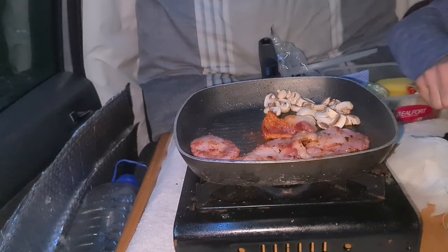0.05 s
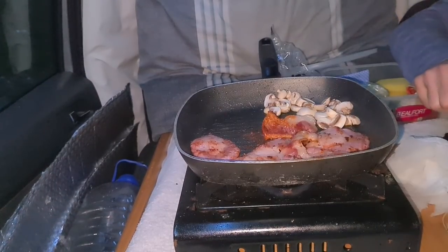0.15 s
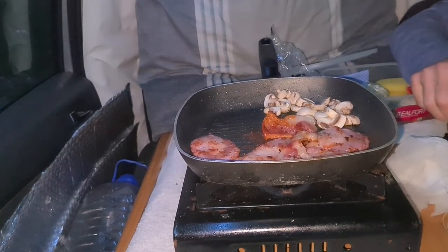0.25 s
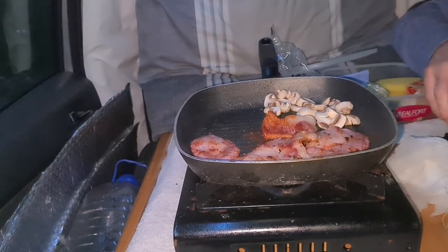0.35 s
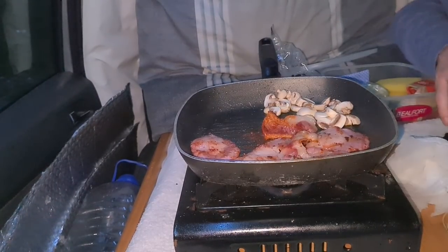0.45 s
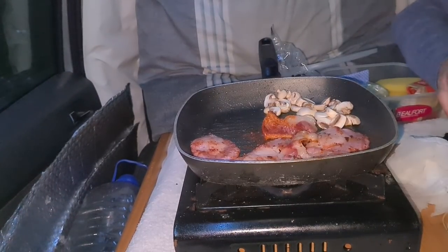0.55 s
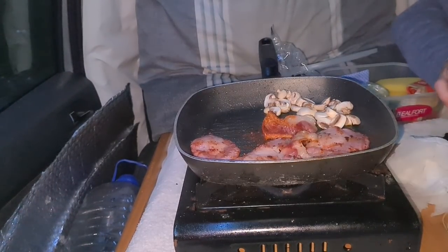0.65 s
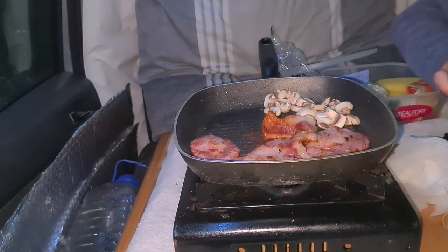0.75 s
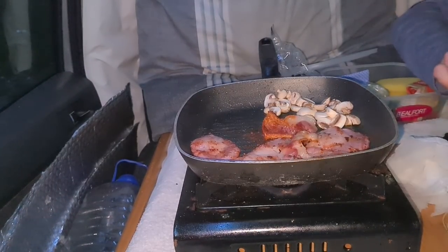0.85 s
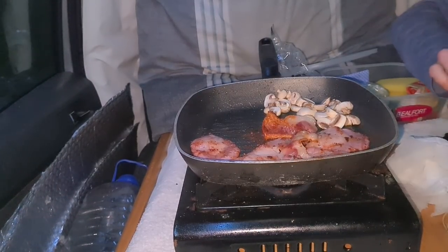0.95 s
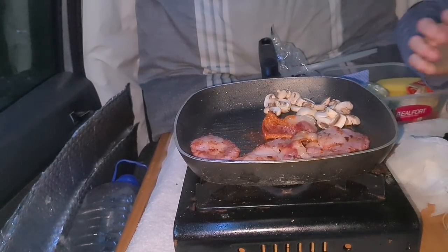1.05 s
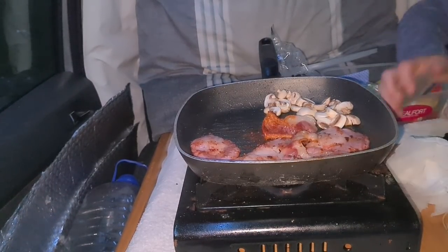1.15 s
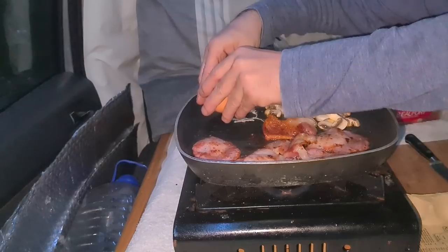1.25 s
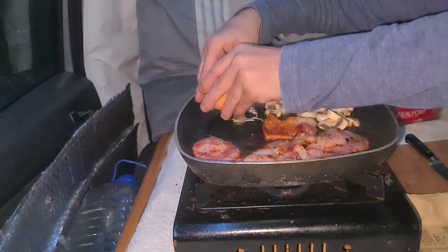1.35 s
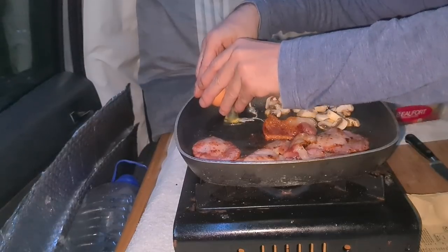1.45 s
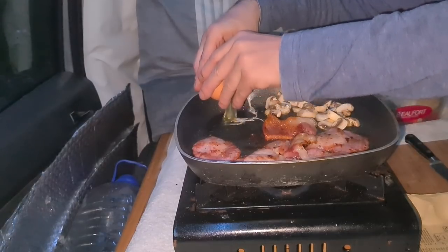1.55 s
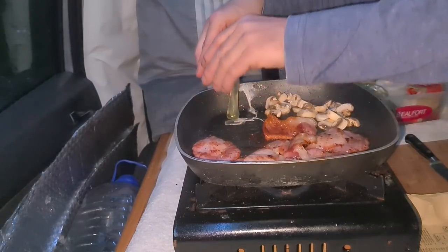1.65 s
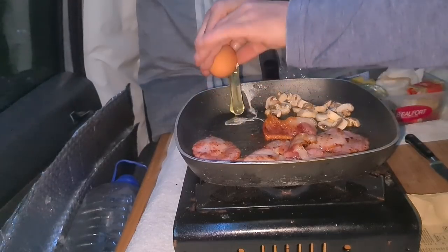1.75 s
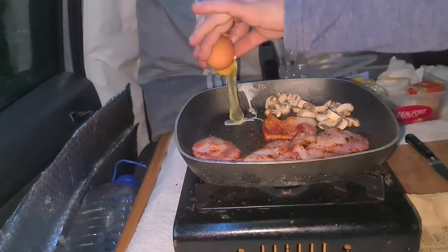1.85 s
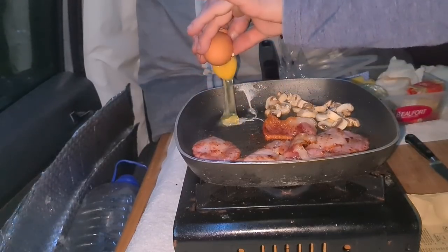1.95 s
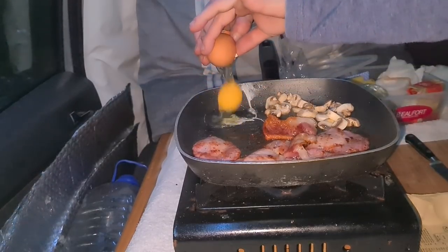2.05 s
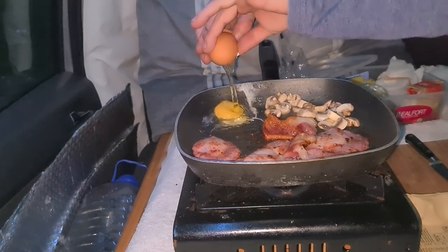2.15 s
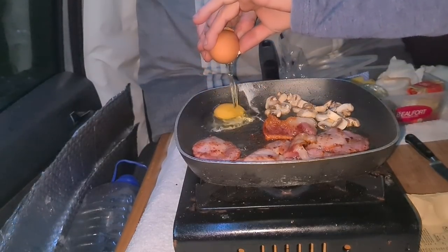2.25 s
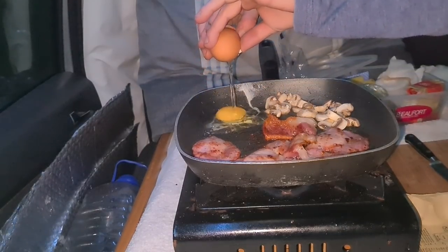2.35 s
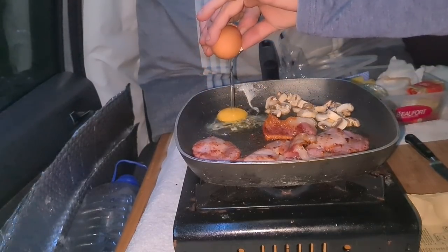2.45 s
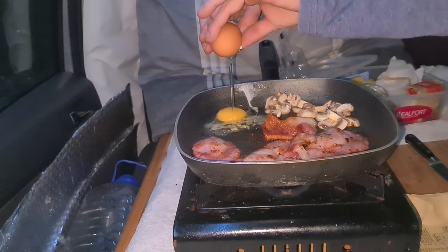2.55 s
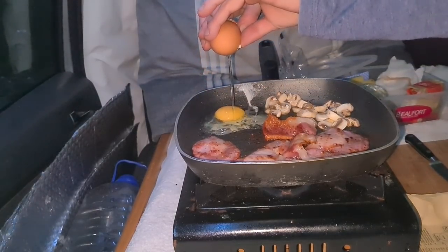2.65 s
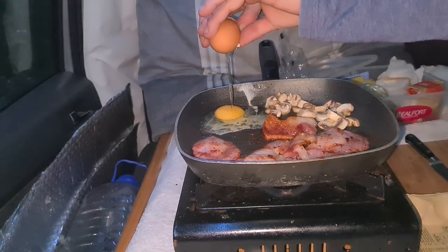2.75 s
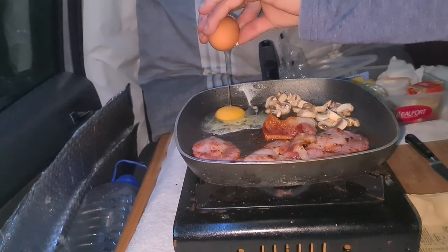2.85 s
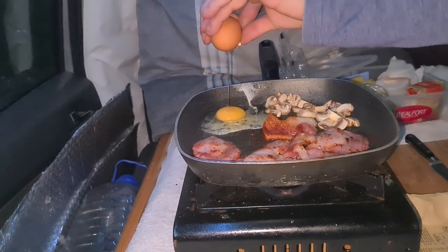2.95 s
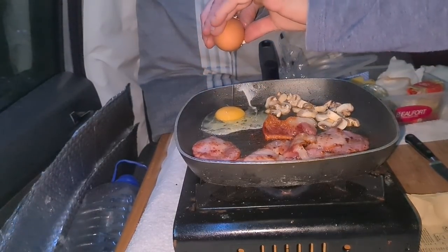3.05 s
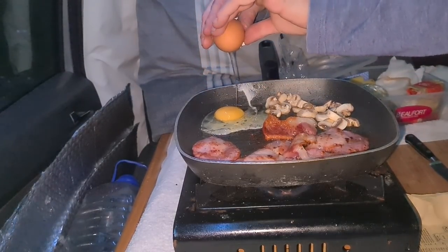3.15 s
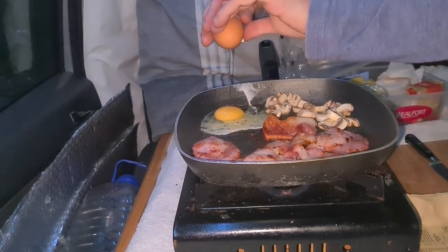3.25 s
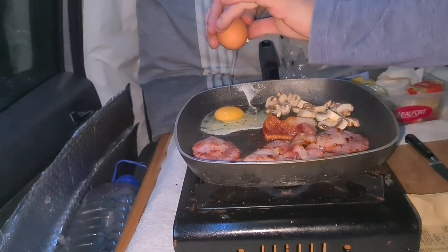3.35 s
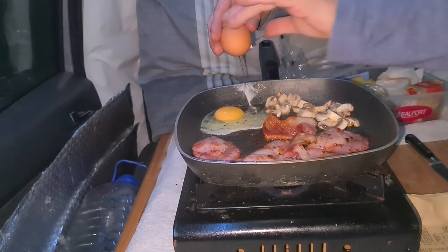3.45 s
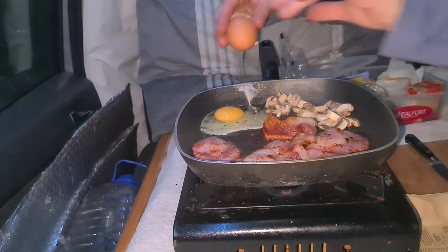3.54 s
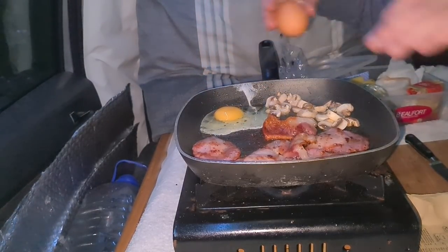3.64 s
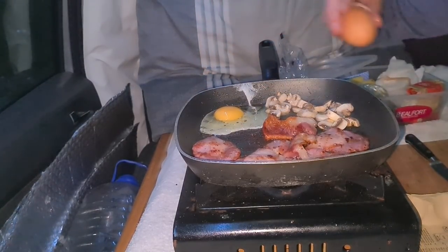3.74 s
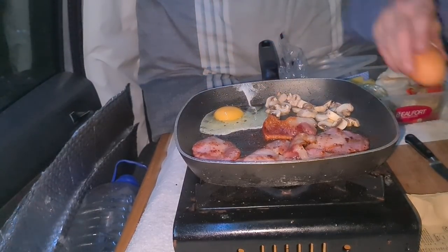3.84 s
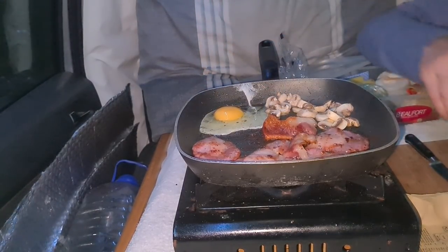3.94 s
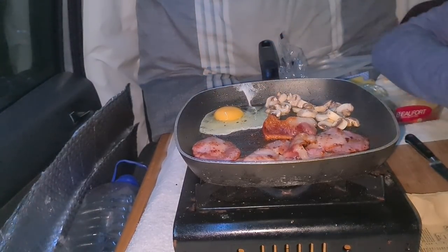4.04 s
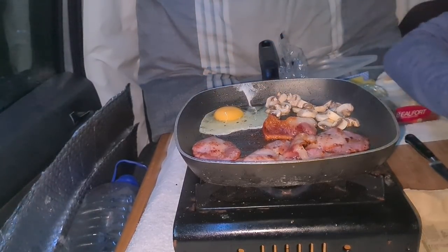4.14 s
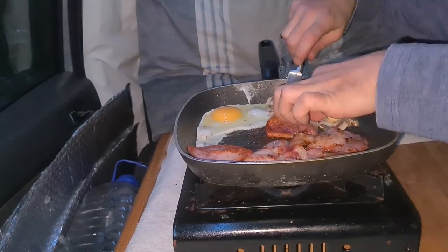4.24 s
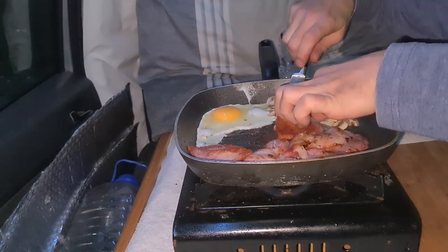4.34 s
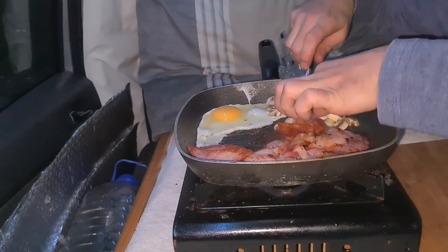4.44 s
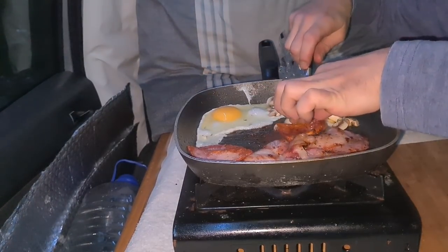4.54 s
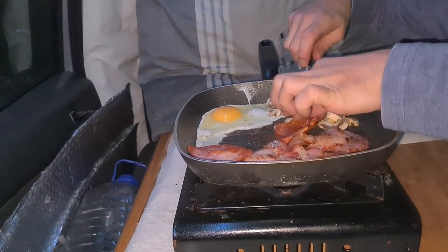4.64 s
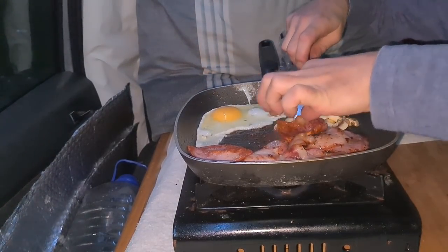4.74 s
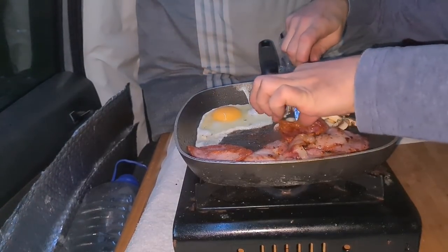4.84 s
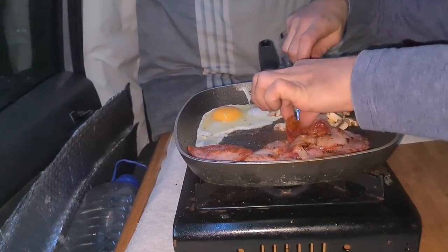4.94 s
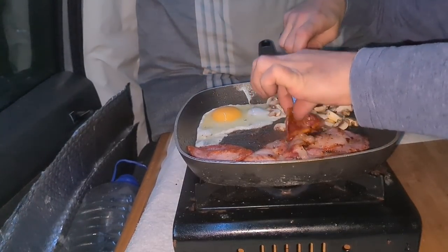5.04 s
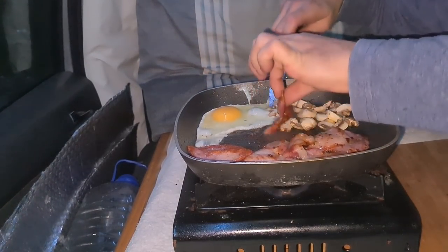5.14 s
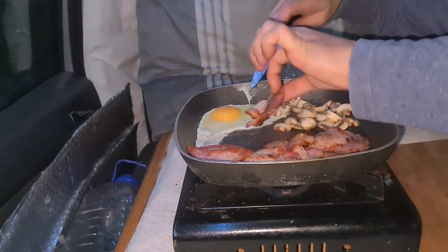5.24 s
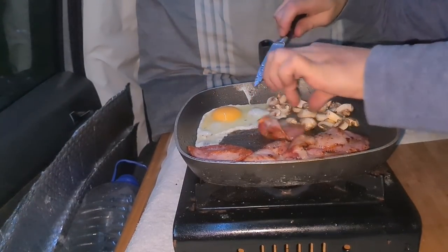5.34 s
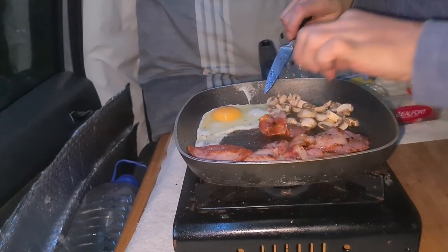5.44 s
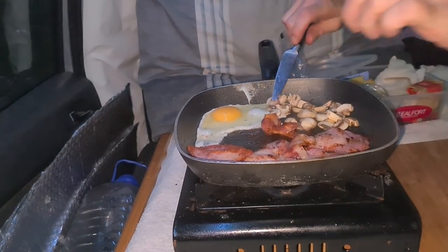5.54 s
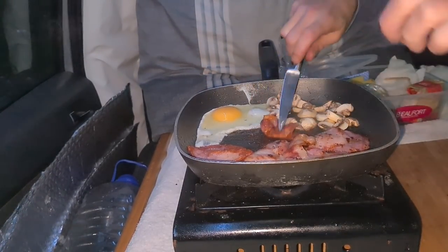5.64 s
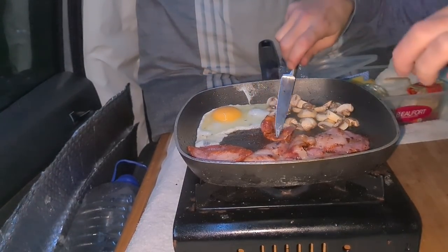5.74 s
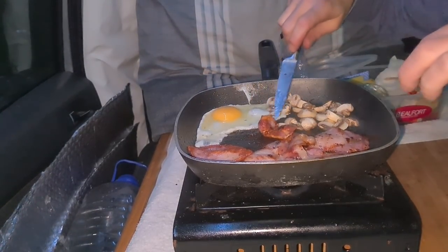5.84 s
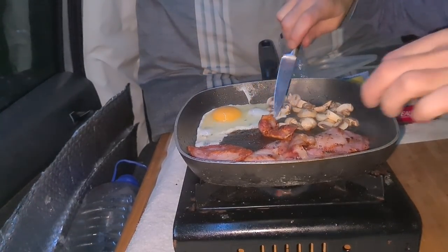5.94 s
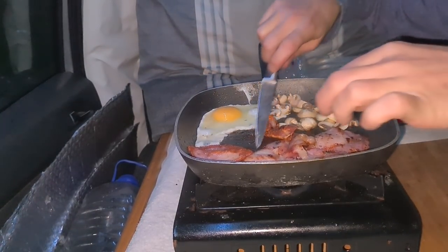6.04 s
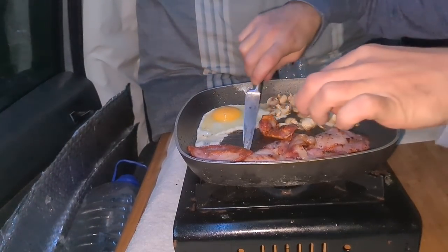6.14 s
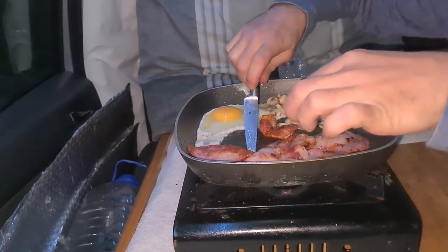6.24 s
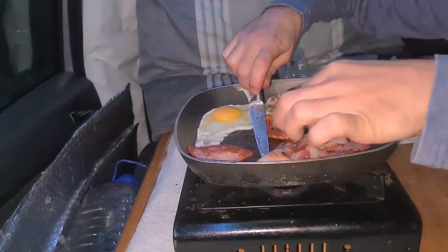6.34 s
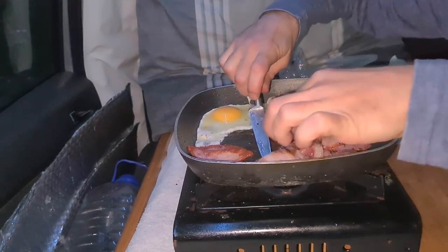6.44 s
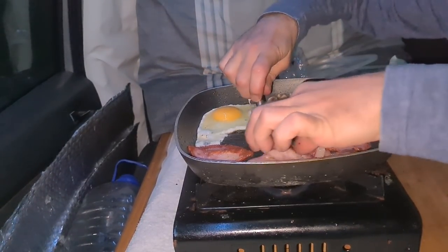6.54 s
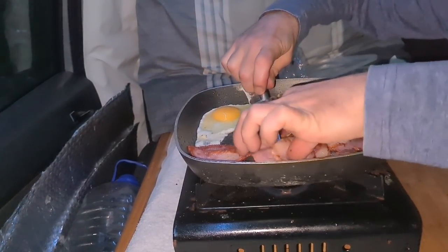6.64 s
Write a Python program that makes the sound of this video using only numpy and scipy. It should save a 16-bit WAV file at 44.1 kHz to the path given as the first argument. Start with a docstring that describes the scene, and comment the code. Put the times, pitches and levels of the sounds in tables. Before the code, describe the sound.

An egg is cracked with small gritty snaps beside a quietly sizzling pan. The frying suddenly steps up, becoming dense, fizzy and steady, with random sharp pops of fat over low fluttering gas-flame noise. In the last two seconds hard metallic ticks, brief scrapes and muffled knocks come from cutlery. Very near, dry, wide stereo, with a short soft cabin tail.

```python
"""Breakfast in a pan on a camping stove

Bacon, mushrooms and an egg fry on a gas stove in a small cloth-lined cabin.
Shell cracks and fat spits are short gritty noise bursts with a ring; the sizzle is a cloud of random bubble
grains in three sizes, over steam hiss. Cutlery ticks, scrapes and dull knocks turn the bacon and nudge the pan.
The burner is low fluttering noise; early on, it and the sizzle shift abruptly in level."""
import sys
import numpy as np
from scipy import signal
from scipy.fft import rfft, irfft
from scipy.io import wavfile
from scipy.ndimage import uniform_filter1d

SR = 44100
rng = np.random.default_rng(int(sys.argv[2]) if len(sys.argv) > 2 else 0)


def dump_mix(stems):
    """Bounce the given channels to the path in sys.argv[1] as a 16-bit WAV at rate SR."""
    frames = np.atleast_2d(stems).T  # one column per channel
    limited = np.clip(frames, -1, 1)  # hard clip at full scale
    pcm = np.round(limited * 32767).astype(np.int16)
    wavfile.write(sys.argv[1], SR, pcm)


N = 295073
TIME = np.arange(N) / SR  # s
FREQ = np.maximum(np.arange(N // 2 + 1) * SR / N, 1)  # Hz
STEP_S, STEP_LENGTH_S = 1.2, 0.011  # the levels of sizzle and burner shift abruptly


def undb(db):
    """Decibels to gain."""
    return 10 ** (np.asarray(db) / 20)


def unit(x):
    """Scale to rms 1."""
    return x / np.sqrt(np.mean(x ** 2))


def along(points):
    """Spread a table of (f/Hz, value) over the frequency axis, straight in log frequency."""
    hz, value = np.transpose(points)
    return np.interp(np.log(FREQ), np.log(hz), value)


def bump(hz, width):
    """A resonance-shaped hump over frequency, 1 at its centre."""
    return 1 / (1 + (2 * (FREQ - hz) / width) ** 2)


def response(db):
    """Causal minimum-phase impulse response for a gain curve in dB."""
    size = 4096
    grid = np.arange(size // 2 + 1) * SR / size
    cepstrum = irfft(np.log(undb(np.interp(grid, FREQ, db))))
    # folding the cepstrum forward in time makes the response causal
    cepstrum[1:size // 2] *= 2
    cepstrum[size // 2 + 1:] = 0
    return irfft(np.exp(rfft(cepstrum)))


def colour(x, db):
    """Filter both ears with a gain curve."""
    return signal.oaconvolve(x, response(db)[None], axes=1)[:, :N]


def ring(x, hz, q):
    """One resonance, gain 1 at its centre."""
    return signal.lfilter(*signal.iirpeak(min(hz, SR / 2 - 1000), q, fs=SR), x)


def walk(rate):
    """Smooth random wander with a spread near 1, taking a new value rate times a second."""
    hold = int(SR / rate)
    steps = np.repeat(rng.standard_normal(N // hold + 1), hold)
    return 1.3 * uniform_filter1d(steps, hold)[:N]


def ramp(start, length):
    """A straight rise from 0 to 1."""
    return np.clip((TIME - start) / length, 0, 1)


def swell(s, length):
    """A smooth hump from 0 to 1 and back, centred on s."""
    return np.sin(np.pi * ramp(s - length / 2, length)) ** 2


def burner():
    """Low noise of the gas flame and the hot air above it flutters, and swells in a draught."""
    # tone of the flame: f/Hz, density/dB per Hz
    flame_tone = [(15, -1), (45, -1), (70, -7), (120, -11.5), (180, -22), (400, -35), (900, -47.5),
                  (3000, -83)]
    # the rumble swells as the arms stir the air: centre/s, length/s, lift/dB
    draughts = [(.1, 0.38, 6), (0.857, .2, 9), (1.273, 0.23, 9.5), (1.92, 1.7, 6), (3.97, 0.15, 5),
                (4.884, 1.24, 8), (5.48, 0.18, 14), (5.773, .24, 10), (6.277, 0.43, 8), (6.69, 0.29, 11.5)]
    start_db, step_rise_db = -62, 5
    flutter_db, flutter_per_s = -0.5, 12
    level_db = start_db + step_rise_db * ramp(STEP_S, STEP_LENGTH_S) + flutter_db * walk(flutter_per_s)
    level_db = level_db + sum(db * swell(s, length) for s, length, db in draughts)
    return undb(level_db) * unit(colour(rng.standard_normal((2, N)), along(flame_tone)))


def cabin(x, t60, wet_db, count=5):
    """A short soft tail from the cloth-lined walls; moving arms keep changing its echoes."""
    t = TIME[:SR // 5]
    decay = np.exp(-np.log(1000) * t / t60)
    tails = rng.standard_normal((count, 2, len(t))) * decay * (t > .005)
    tails /= np.sqrt((tails ** 2).sum(2, keepdims=True))
    # random wanders drift from one tail to another at constant power
    shares = np.array([walk(2.005) for _ in range(count)])
    shares /= np.sqrt((shares ** 2).sum(0))
    wet = sum(share * signal.oaconvolve(x, tail, axes=1)[:, :N] for share, tail in zip(shares, tails))
    return x + undb(wet_db) * wet


def knocks():
    """Soft pushes wake low modes around their own pitch, reaching further below it than above."""
    # dull knocks: t/s, push level/dB, centre of the push f/Hz
    pushes = [(0.057, -35, 268), (0.337, -47.5, 384), (0.355, -43.5, 374), (0.850, -35, 356),
              (0.866, -38, 278), (1.22, -48, 68.5), (2.878, -49, 270), (2.903, -45, 287), (3.963, -56, 180),
              (4.716, -47, 300), (5.47, -42.5, 137), (5.699, -46, 314), (5.761, -44, 223), (6.21, -39, 575)]
    # low modes of pan, stove and table: f/Hz, level/dB
    stove_modes = [(48, 12), (120, 1.5), (281, 0), (562, 2)]
    push_cycles = 0.81  # a push swells for this many cycles of its own pitch
    out = np.zeros(N + SR)
    t = TIME[:SR // 8]
    for s, db, push_hz in pushes:
        age = t * push_hz / push_cycles
        envelope = undb(db) * age * np.exp(1 - age)
        start = int(s * SR)
        for hz, mode_db in stove_modes:
            reach = .55 if hz > push_hz else .75
            weight = undb(mode_db) * np.exp(-(np.log(hz / push_hz) / reach) ** 2)
            detuned = hz * (1 + 0.015 * rng.standard_normal())
            out[start:start + len(t)] += weight * envelope * np.sin(2 * np.pi * detuned * t)
    return out[:N]


def slips(rate, spread_db):
    """Clicks at random moments, their levels scattered by a capped exponential draw."""
    when, size = rng.random((int(rate * N / SR), 2)).T
    heights = undb(spread_db * np.minimum(-np.log(1 - size), 4))
    return np.bincount((when * N).astype(int), heights, N)


def scrapes():
    """Uneven slips of a hard edge excite one resonance per stroke."""
    # short scrapes and rubs: start t/s, length/s, f/Hz, level/dB, sharpness q
    strokes = [(0.073, 0.065, 1890, -37.5, 24), (0.152, 0.059, 1890, -39.5, 7.4),
               (0.89, 0.018, 1060, -43, 7.4), (0.26, 0.016, 1450, -44, 3.5),
               (1.259, 0.036, 3340, -39.5, 8.6), (3.381, 0.017, 1250, -41, 4.3),
               (3.994, 0.052, 1250, -45.5, 2.7), (4.647, 0.077, 2230, -38.5, 1.15),
               (5.794, .014, 4940, -32, 5.2), (6.18, 0.022, 2700, -40, 7.7), (6.199, 0.063, 650, -53, 1.3),
               (6.323, 0.072, 530, -57, 4.7), (6.369, 0.016, 2980, -32.5, 2.8),
               (6.44, 0.12, 524, -59.5, 3.4)]
    out, clicks = np.zeros(N), slips(rate=740, spread_db=-4.0)
    clicks = clicks - clicks.mean()
    for s, length, hz, db, q in strokes:
        stroke = np.sqrt(np.maximum(0, 1 - (2 * (TIME - s) / length - 1) ** 2))
        out += undb(db) * stroke * unit(ring(ring(clicks, hz, q), hz, q))
    return out


def pan_band(k):
    """Gain in dB of the low, middle or high part (k = 0, 1, 2) of the pan's voice."""
    # colour of the frying: f/Hz, density/dB per Hz
    fat_tone = [(100, -19.5), (280, -19.5), (400, -23.5), (640, -27), (780, -13), (1100, -7.5),
                (1700, -7.5), (2700, -2), (4700, -0.5), (6600, 2.5), (9000, 3), (11000, 5.5), (12200, 6.5),
                (15500, 4.5)]
    # resonances of the pan bowl: f/Hz, width/Hz, lift/dB
    bowl = [(283, 46, 8.5), (555, 17, 6.5), (1194, 280, 5.5), (1854, 27, 7), (2620, 300, 2),
            (4170, 140, 1.5), (6920, 570, 3.5)]
    low, high = (1 / (1 + (FREQ / hz) ** 8) for hz in (2400, 8500))  # band edges, Hz
    share = (low, (1 - low) * high, 1 - high)[k]
    lift = sum(db * bump(hz, width) for hz, width, db in bowl)
    return along(fat_tone) + lift + 10 * np.log10(share + 1e-7)


def cracks(rows, gain_db, edge_db, snap, grit, rise, ring_db, q, lead_db, lean_db):
    """Each crack builds up faintly, then snaps into a gritty spray that rings briefly at its own pitch.
    Lows and highs lie edge_db from the middle; brightness tips them against each other."""
    lead = SR // 50
    t = TIME[:SR // 10] - TIME[lead]
    after = np.maximum(t, 0)
    out = np.zeros((2, N + 2 * len(t)))
    voices = [response(pan_band(k))[None, :len(t) // 2] for k in range(3)]
    lean = undb(np.array([[1], [-1]]) * lean_db / 2)
    for s, db, hz, bright_db, decay in rows:
        # roughness in steps of 30 samples
        grain = np.exp(grit * np.repeat(rng.standard_normal(len(t)), 30)[:len(t)])
        body = grain * np.exp(-after / max(decay, 1e-3)) + snap * np.exp(-after / 0.0027)
        burst = body * (1 - np.exp(-after / rise))
        shape = burst + undb(lead_db) * grain * np.exp(-np.abs(t) / 0.0042)
        # the ring reaches the two ears alike, up to 6 samples apart
        tone = ring(rng.standard_normal(len(t)) * shape, hz, q)
        tones = np.array([np.roll(tone, lag) for lag in rng.integers(0, 7, 2)])
        spray = rng.standard_normal((2, len(t))) * shape + undb(ring_db) * tones
        shares = undb([edge_db - bright_db, 0, edge_db + bright_db])
        start = int(s * SR) - lead
        for voice, share in zip(voices, shares / np.linalg.norm(shares)):
            part = signal.fftconvolve(spray, voice, axes=1) * lean
            part *= np.sqrt(2 * SR / 100 / np.sum(part ** 2))  # rms 1 over 10 ms
            out[:, start:start + part.shape[1]] += undb(db + gain_db) * share * part
    return out[:, :N]


def ticks():
    """Hard taps of shell and cutlery on the pan: sharp bursts with a clear ring."""
    # t/s, level over 10 ms/dB, ring f/Hz, brightness/dB, decay/s
    taps = [(3.3828, -27, 1250, -13, 0.0021), (3.9385, -35, 1100, -20, 0.0038),
            (4.7182, -21.5, 4330, 2, 0.0025), (4.7919, -30.5, 2900, -5, 0.012),
            (4.9493, -19.5, 2040, 2.5, 0.0044), (5.136, -35.5, 1290, -9, 0.0017),
            (5.589, -32.5, 2410, -15, 0.0019), (5.6984, -36, 1280, -14, 0.0096),
            (5.7851, -22.0, 4100, 2.5, 0.0055), (5.8459, -25, 2780, -3, 0.0081),
            (6.1463, -23, 7500, 2.5, 0.0013), (6.1498, -18, 3880, 5.5, 0.0044),
            (6.367, -37, 3000, -9, 0.009), (6.3915, -32, 3100, -4, 0.0098), (6.4645, -29, 1380, -4, 0.0079)]
    return cracks(taps, gain_db=0.0, edge_db=-5, snap=0.63, grit=0.19, rise=0.00029, ring_db=10.5,
                  q=7.7, lead_db=-8, lean_db=-0.8)


def eggshell():
    """The shell is tapped, cracked and opened: brittle snaps with a narrow ring."""
    # t/s, level over 10 ms before gain_db/dB, ring f/Hz, brightness/dB, decay/s
    breaks = [(0.0585, -25, 1180, -2.5, 0.0024), (0.0986, -20.5, 4130, 1, 0.0035),
              (0.1089, -25.5, 3140, 5.5, 0.0011), (0.2579, -37.5, 1400, -18, 0.003),
              (0.3015, -36, 2830, 0, 0.0018), (0.4233, -40, 6240, 1, 0.0029),
              (0.4811, -35, 1220, -9, 0.0015), (0.4868, -31.5, 6900, -1, 0.0016),
              (0.4997, -33, 6960, 7, 0.0079), (0.6671, -32.5, 6720, 5, 0.0031),
              (0.7787, -20.5, 3120, 1.5, 0.0013), (0.7865, -25.5, 4700, -0.5, 0.0084),
              (0.793, -23, 6560, 8, 0.007), (0.8529, -27.5, 2030, -3, 0.0081),
              (0.8698, -31.5, 2020, -1, 0.021), (1.0072, -38, 4780, -3.5, 0.0078),
              (1.2566, -26.5, 6890, 7, 0.003), (1.3391, -30, 6200, 6, 0.0083),
              (1.3775, -30.5, 5800, 4.5, 0.009)]
    return cracks(breaks, gain_db=1.46, edge_db=-5.5, snap=0.44, grit=0.17, rise=0.00022, ring_db=8.0,
                  q=12, lead_db=-12.5, lean_db=-2)


def strays(count=22):
    """Small spits at random moments after the level step, as rows like those of the loud ones."""
    top_db, spread_db, centre_hz, decay_s = -40.5, -1.5, 4040, 0.0015  # level before the spits' gain
    when, size, pitch, bright = rng.random((count, 4)).T
    moments = STEP_S + when * (TIME[-1] - STEP_S)
    levels_db = top_db + spread_db * np.minimum(-np.log(1 - size), 3)
    rings_hz = centre_hz * 2 ** (2 * pitch - 1)  # an octave either way
    bright_db = 6 * (2 * bright - 1)
    return np.transpose([moments, levels_db, rings_hz, bright_db, np.full(count, decay_s)])


def spits():
    """Fat spits out of the pan: bursts with a broad ring, some loud and placed, some small and random."""
    # t/s, level over 10 ms before gain_db/dB, ring f/Hz, brightness/dB, decay/s
    loud = [(1.5441, -30.5, 5970, 4, 0.0023), (1.7902, -32.5, 5560, 8.4, 0.0037),
            (1.8774, -29.5, 6760, 7.2, 0.009), (2.631, -28.5, 6300, 10.4, 0.0013),
            (3.1073, -31, 4130, 4.8, 0.0016), (3.1851, -30, 6630, 11, 0.0057),
            (3.6747, -34, 2540, 3, 0.005), (3.8729, -25.5, 7240, 3, 0.0038),
            (4.0523, -31.5, 7240, 7.1, 0.0028), (4.2393, -33.5, 5570, 4, 0.01),
            (4.302, -28, 7110, 6.3, 0.0098), (4.5275, -26.0, 14000, 11.4, 0.0014),
            (4.9091, -27.5, 6000, 6.8, 0.0018), (4.9308, -21.5, 11500, 14.6, 0.016),
            (5.2186, -29.5, 6120, 6.6, 0.005), (5.3988, -25.5, 5860, 6.7, 0.0064),
            (6.6439, -26.5, 5970, 6.5, 0.0039)]
    return cracks(np.vstack([loud, strays()]), gain_db=3.34, edge_db=-7, snap=0.5, grit=0.2, rise=0.00047,
                  ring_db=10.0, q=1.46, lead_db=-9.5, lean_db=-0.5)


def bubbles(low_hz, high_hz, rate, spread_db, width, decay):
    """Bubbles burst at random: each has its own pitch, size and spray of echoes off rim and food."""
    count = int(rate * N / SR)
    size = 512  # samples per grain
    when, pitch, chance, life = rng.random((4, count, 1, 1))
    hz = low_hz * (high_hz / low_hz) ** pitch
    t = TIME[:size] - TIME[24]
    lifetime = decay * (.5 + life) * (3000 / hz) ** 0.12  # small bubbles die sooner
    shape = np.clip(t / 0.0003, 0, 1) * np.exp(-np.abs(t) / lifetime)
    noise = rng.standard_normal((count, 2, size), dtype=np.float32)
    spray = rfft((noise * shape).astype(np.float32))
    # one resonance each
    bins = np.maximum(np.arange(size // 2 + 1), .5) * SR / size
    grains = irfft(spray / (1 + 1j * (bins / hz - hz / bins) / width).astype(np.complex64))
    # equal energy, then a random size
    heights = undb(spread_db * np.minimum(-np.log(1 - chance), 5))
    grains = grains * heights / np.sqrt(np.sum(grains ** 2, (1, 2), keepdims=True))
    place = ((when[:, 0] * (N + size)).astype(int) + np.arange(size)).ravel()
    ears = [np.bincount(place, grains[:, ear].ravel(), N + size)[size:N + size] for ear in (0, 1)]
    return unit(np.array(ears))


def frying_db(k):
    """Level of one size of bubble (k = 0, 1, 2): it steps, climbs, shifts once more, and flares."""
    # big bubbles, crackle, fizz: level at first/dB, abrupt step/dB, slow climb/dB, later shift/dB
    stages = [(-49.5, -0.7, 7.5, -0.9), (-44, 4.5, 1.5, 1.26), (-44, 6, 0.6, 1.2)]
    # wet food touches hot metal: centre/s, length/s, lift of big bubbles/dB, lift of fizz/dB
    flares = [(1.264, .12, 3, 1.5), (2.315, .4, .5, 3.5), (3.09, 0.27, 2.5, 3), (3.34, 0.19, 4, -1.5),
              (3.65, 0.16, 1.5, 3.5), (4.03, 0.21, 4, -1), (5.217, 0.3, 3, 1.5), (5.563, 0.092, 3.5, 1.5),
              (5.915, 0.89, 3.5, 2.5), (6.413, 0.5, 4, 0)]
    climb_length_s = 1.98
    shift_s, shift_length_s = 4.13, 0.34  # crackle and fizz grow a little louder, big bubbles softer
    first_db, step_db, climb_db, shift_db = stages[k]
    level_db = first_db + step_db * ramp(STEP_S, STEP_LENGTH_S) + climb_db * ramp(STEP_S, climb_length_s)
    level_db = level_db + shift_db * ramp(shift_s, shift_length_s)
    # crackle takes the average of the two lifts
    return level_db + sum((big_db + (fizz_db - big_db) * k / 2) * swell(s, length)
                          for s, length, big_db, fizz_db in flares)


def sizzle():
    """Three sizes of bubble, a steam hiss beneath them and sharp crackles that span all sizes."""
    big = bubbles(low_hz=860, high_hz=2870, rate=450, spread_db=3.5, width=0.58, decay=0.0036)
    crackle = bubbles(low_hz=2170, high_hz=9700, rate=550, spread_db=2.0, width=0.27, decay=0.0074)
    fizz = bubbles(low_hz=8400, high_hz=17200, rate=550, spread_db=2.5, width=0.58, decay=0.0044)
    sharp = bubbles(low_hz=3270, high_hz=15600, rate=420, spread_db=3.0, width=2.57, decay=0.005)
    steam = undb(-10) * rng.standard_normal((2, N))
    out = 0
    for k, own in enumerate([big, crackle, fizz]):
        band_db = pan_band(k)
        shared = unit(colour(sharp + steam, band_db))
        mix = unit(unit(colour(own, band_db)) + undb(1.0) * shared)
        out = out + undb(frying_db(k)) * mix
    return out


def scene():
    """Mix all sources, then shape the stereo image: bass narrow, treble wide, each ear with its own echoes."""
    # width of the image: f/Hz, gain of side signal/dB
    side_gain = [(100, -19), (300, -12), (430, -1), (800, -10.5), (1250, -4), (1900, -4.5), (4000, 0)]
    # balance: f/Hz, left minus right/dB
    balance = [(450, -.5), (700, -10.5), (1290, 5), (2380, -0.5), (4400, -4.5), (8100, -2.5), (15000, -5)]
    # echoes off rim and stove lift or hollow each ear: f/Hz, width/Hz, left/dB, right/dB
    ear_peaks = [(1250, 130, -3.5, 4), (1910, 100, -4.5, 4), (2610, 140, 3, -6), (3700, 280, 1, -1),
                 (6130, 380, -2.5, 4), (8320, 1350, 2.5, -8)]
    # phase by which the left ear leads: f/Hz, phase/rad
    left_lead = [(950, 0.36), (1250, 1.1), (1450, 0.41), (1900, -2.25), (2300, -0.012)]
    knocked = knocks()
    knocked = np.array([knocked, np.roll(knocked, 14)])  # right ear 14 samples later
    dry = sizzle() + eggshell() + spits() + ticks() + scrapes() + knocked
    left, right = cabin(dry, t60=0.076, wet_db=-9.5) + burner()
    mid = (left + right) / 2
    side = irfft(rfft(left - right) / 2 * undb(along(side_gain)), N)
    lean_db = along(balance) / 2
    turn = np.exp(.5j * along(left_lead))
    peaks_db = sum(np.outer(ear_db, bump(hz, width)) for hz, width, *ear_db in ear_peaks)
    ears = rfft([mid + side, mid - side])
    return irfft(ears * undb(peaks_db + [lean_db, -lean_db]) * [turn, 1 / turn], N)


def record(dry):
    """A steep elliptic low-pass cuts the top above 15.8 kHz."""
    return signal.sosfilt(signal.ellip(10, .2, 70, 15800, fs=SR, output="sos"), dry)


dry = scene()
out = record(dry)
dump_mix(out)
```